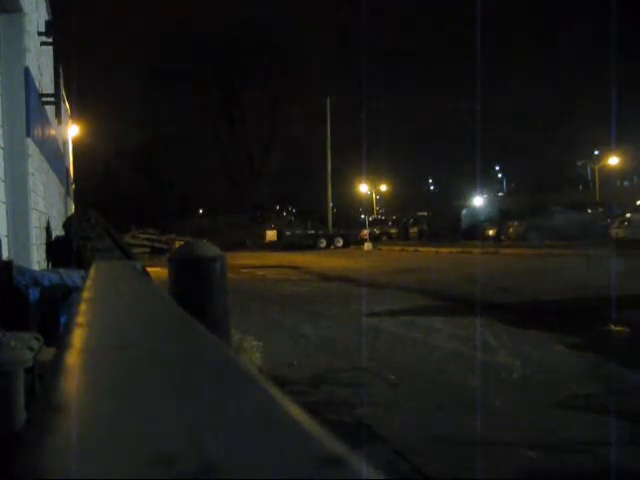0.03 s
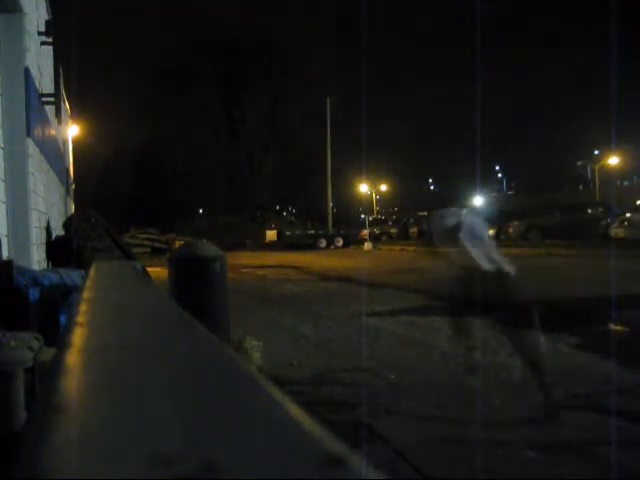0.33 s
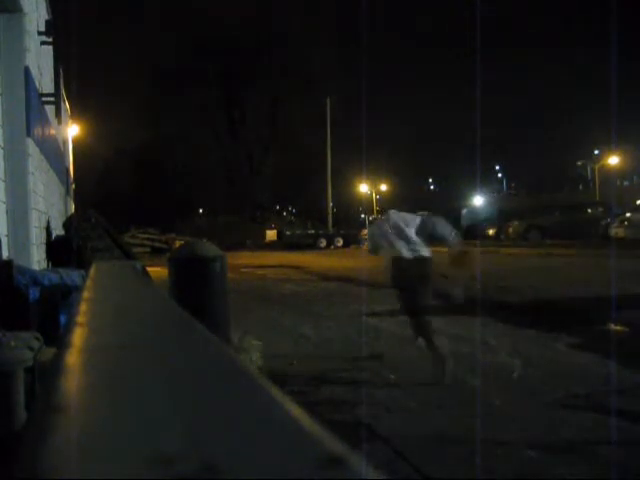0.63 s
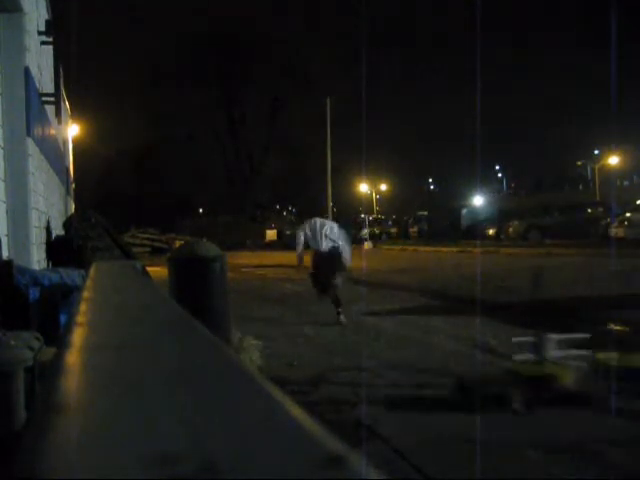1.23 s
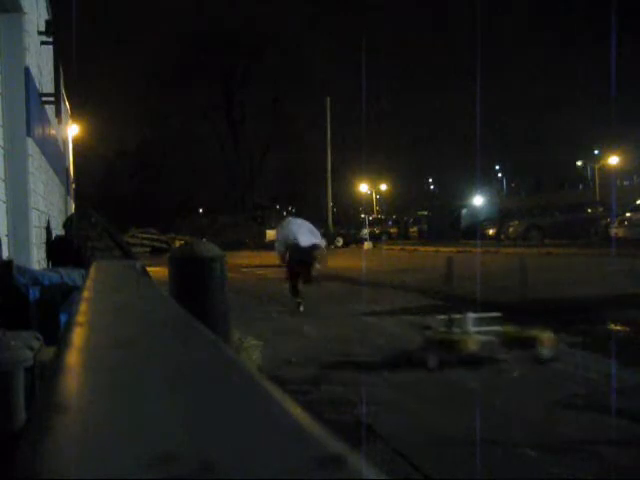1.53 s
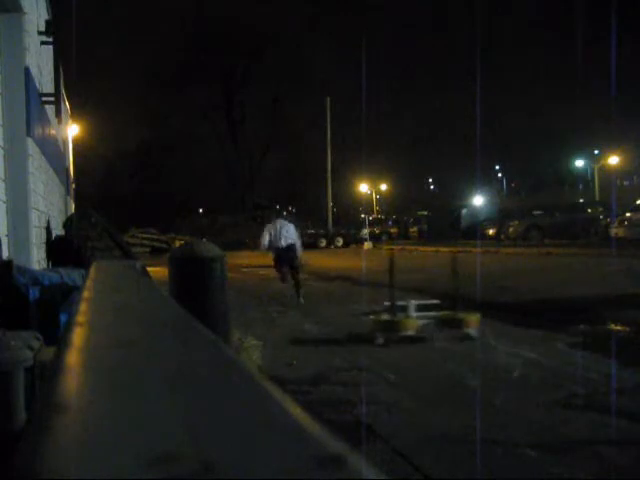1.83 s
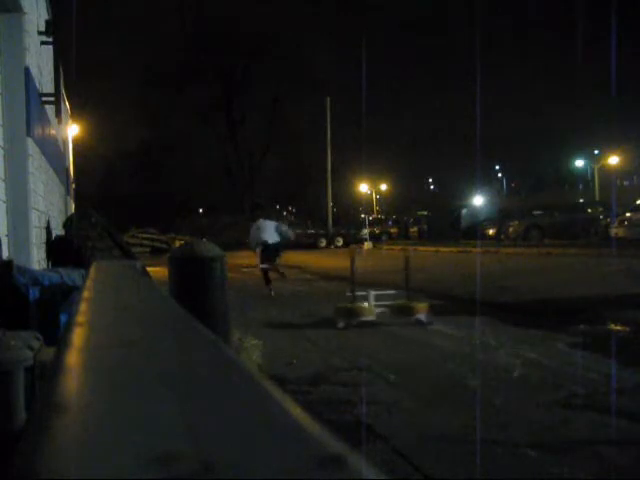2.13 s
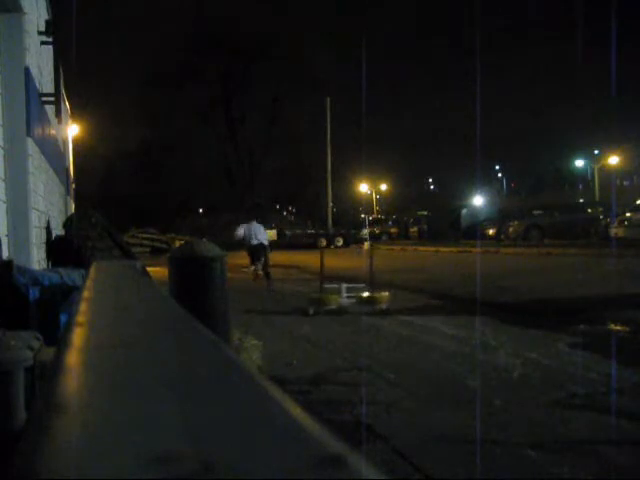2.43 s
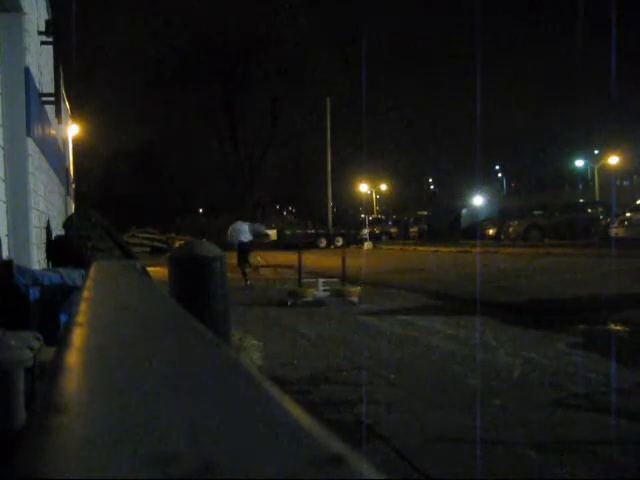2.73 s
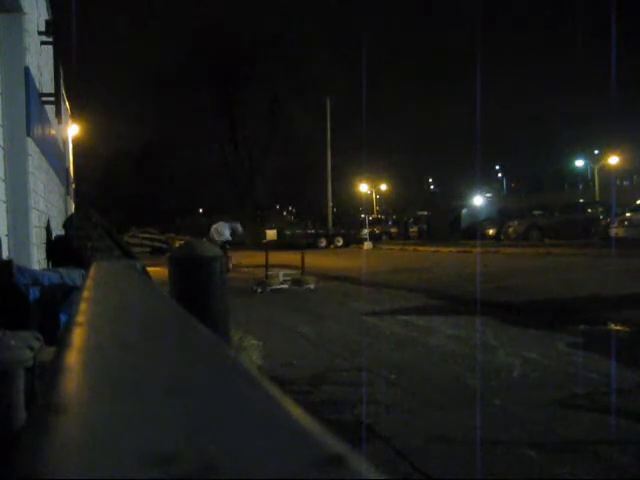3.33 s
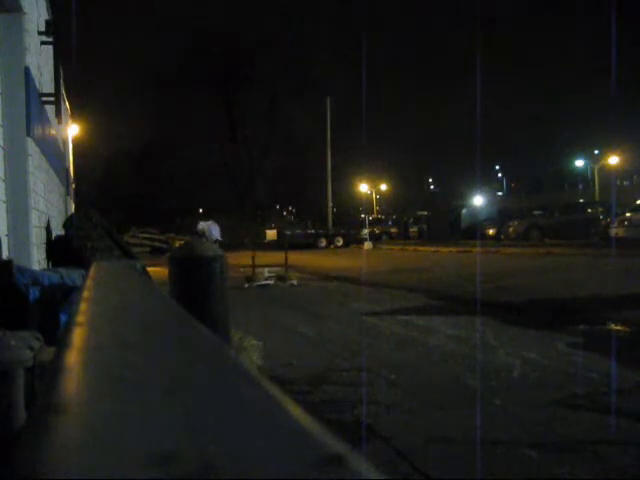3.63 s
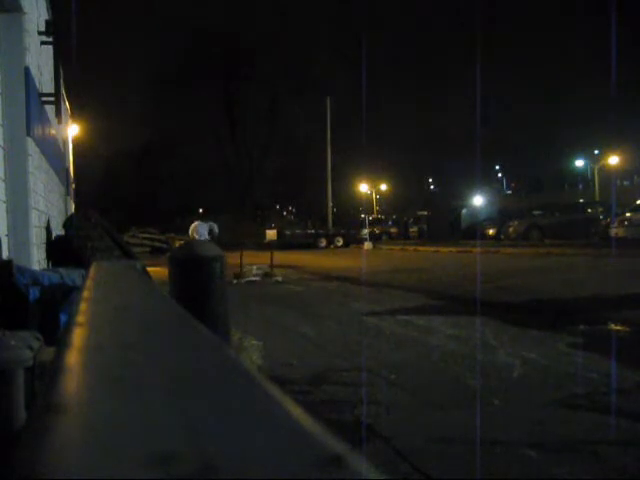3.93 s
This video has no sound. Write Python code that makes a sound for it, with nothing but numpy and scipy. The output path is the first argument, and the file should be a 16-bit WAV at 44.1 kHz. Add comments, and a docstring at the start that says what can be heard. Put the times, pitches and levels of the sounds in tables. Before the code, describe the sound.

Rough, continuous scraping comes from a steel sled dragged over outdoor pavement. Stones tick against it, the skids squeak briefly, and knocks grow more frequent in the second half. Underneath, a low rumble builds and dull buffets touch the microphone.

```python
"""Steel skids grind over grit as a heavy sled is towed away at a run across a paved yard at night.
The scrape shakes the frame into a ringing chatter, and stones tick and ping off the steel.
Bumps make it clank, and the skids squeal briefly as they stick and slip.
Underneath runs a low rumble, and dull buffets reach the microphone, which has a deep treble notch.
The recorder's gain control ducks after the hardest knocks."""
import sys
import numpy as np
from scipy import signal
from scipy.fft import rfft, irfft
from scipy.io import wavfile
from scipy.ndimage import uniform_filter1d

SR = 44100
rng = np.random.default_rng(int(sys.argv[2]) if len(sys.argv) > 2 else 0)


def file_out(sig):
    """Save sig as 16-bit WAV at sys.argv[1]."""
    # one column per channel
    cols = np.atleast_2d(sig).T
    # limit, then scale
    lim = np.clip(cols, -1, 1)
    pcm = np.round(lim * 32767).astype(np.int16)
    wavfile.write(sys.argv[1], SR, pcm)


N = 176400
TIME = np.arange(N) / SR
BIN_HZ = np.arange(N // 2 + 1) * SR / N


def from_db(db):
    """Decibels to gain."""
    return 10 ** (np.asarray(db) / 20)


def rms_one(x):
    """Scale to unit rms."""
    return x / np.sqrt(np.mean(x ** 2) + 1e-20)


def curve(rows):
    """An automation line through (time_s, value) points."""
    return np.interp(TIME, *np.transpose(rows))


def coloured(x, spectrum):
    """EQ a sound through (frequency_hz, gain_db) points; unit rms."""
    hz, db = np.transpose(spectrum)
    eq_db = np.interp(np.log(np.maximum(BIN_HZ, 1)), np.log(hz), db)
    return rms_one(irfft(rfft(x) * from_db(eq_db), N))


def band(x, low_hz, high_hz, order=2):
    """Butterworth band-pass."""
    return signal.sosfilt(signal.butter(order, [low_hz, high_hz], "band", fs=SR, output="sos"), x)


def drift(rate_hz):
    """Smooth random modulation in the two octaves below rate_hz; unit rms."""
    return rms_one(band(rng.standard_normal(N + SR), rate_hz / 4, rate_hz)[SR:])


def resonate(x, hz, width_hz):
    """Ring one two-pole resonance."""
    r = np.exp(-np.pi * width_hz / SR)
    return signal.lfilter([1, 0, -1], [1, -2 * r * np.cos(2 * np.pi * hz / SR), r * r], x + 1e-18)


def grains(per_s, spread_db):
    """Random clicks, mostly small, a few large."""
    sizes = from_db(spread_db * np.minimum(rng.exponential(1, N), 5)) * rng.choice([-1, 1], N)
    return sizes * (rng.random(N) < per_s / SR)


# How hard the skids grind, also driving the catches and pings: time_s, relative_level_db
GRIND_LEVEL = [(0.0, -22), (0.18, -28.5), (0.66, -24.5), (0.69, -23.5), (0.7, -23), (0.75, -26),
               (0.78, -23), (0.79, -19), (0.82, -28), (1.05, -22), (1.22, -26.5), (1.27, -21), (1.35, -22),
               (1.39, -24.5), (1.44, -20), (1.46, -26.5), (1.65, -21.5), (1.66, -23.5), (2.28, -23.5),
               (2.34, -30), (2.37, -22.5), (2.45, -26), (2.46, -17), (2.48, -27), (2.52, -28),
               (2.88, -25.5), (2.945, -28.5), (2.975, -22), (3.0, -25.5), (3.03, -25), (3.07, -28.5),
               (3.1, -25), (3.5, -30), (3.51, -22.5), (3.62, -28), (4.0, -30)]
# Tone of crushed grit, shared with the catches: frequency_hz, gain_db
GRIT_EQ = [(150, -17), (400, -10.5), (700, -9.5), (1000, -4), (1300, -1.5), (1550, -8), (1900, 0.5),
           (2500, -2), (3300, 2), (3900, -2), (4400, -1), (5100, -7), (6300, -6), (7200, -11.5),
           (8800, -12.5), (10200, -17.5), (11200, -14), (12100, -21), (13200, -14), (15400, -18)]
# Thin, high ring of the skids: pitch_hz, width_hz, relative_level_db
SKID_MODES = [(5090, 60, -17), (5930, 380, -10.5), (6360, 190, -12.5), (8820, 100, -19), (9530, 160, -17),
              (10600, 170, -30), (10780, 98, -27), (11460, 110, -24.5), (12200, 60, -30), (12300, 50, -21),
              (13200, 70, -19), (13500, 45, -17), (13800, 50, -29), (14320, 80, -35), (14780, 45, -34)]


def skids():
    """Grit is crushed under the skids, each octave flickering a little, and the steel rings thinly."""
    crush = rfft(grains(per_s=9000, spread_db=1.5))
    octave = np.searchsorted([250, 500, 1000, 2000, 4000, 8000], BIN_HZ)
    grit = sum(irfft(crush * (octave == k), N) * from_db(1.72 * drift(25)) for k in range(7))
    ringing = 0
    for hz, width_hz, db in SKID_MODES:
        waver_db = 3 * drift(19)
        ring = resonate(grains(per_s=9000, spread_db=1.5), hz, width_hz)
        ringing += from_db(db + waver_db) * rms_one(ring)
    crunch = from_db(3.5) * coloured(grit, GRIT_EQ)
    sheen = from_db(-1) * band(ringing, 4600, 14700)
    return from_db(curve(GRIND_LEVEL)) * (crunch + sheen)


# How hard the frame shakes: time_s, relative_level_db
SHAKE_LEVEL = [(0.0, -21), (0.26, -17), (0.38, -24.5), (0.49, -20.5), (0.61, -25.5), (0.69, -18.5),
               (0.71, -37), (0.81, -19.5), (1.08, -24), (1.21, -21.5), (1.22, -22), (1.34, -29),
               (1.35, -10), (1.37, -19.5), (1.86, -17.5), (1.87, -15), (1.89, -17), (2.29, -17.5),
               (2.315, -21.5), (2.36, -14.5), (2.39, -28.5), (2.45, -16.5), (2.53, -22), (2.56, -18),
               (3.01, -23.5), (3.03, -17), (3.04, -23), (3.1, -20.5), (3.46, -20), (3.49, -22.5),
               (3.57, -24), (3.595, -10), (3.61, -19.5), (3.66, -18.5), (3.69, -17), (4.0, -18)]
# Resonances of the steel frame: pitch_hz, width_hz, near_gain_db, far_gain_db
FRAME_MODES = [(732, 73, -15, -16), (906, 220, -16.5, -23), (1121, 150, -12, -23), (1282, 75, -8, -5),
               (1370, 140, -13.5, -13), (1750, 90, -8, -3.5), (1976, 166, -8, -1), (2150, 190, -11, -4),
               (2712, 300, -7.5, -4), (3177, 160, -10, -9.5), (3660, 58, -15, -28), (4200, 190, -17, -16.5)]


def frame(far_from_s=2.16, far_by_s=2.34, pitch_wander=0.02258, flex_hz=16.09):
    """Clumps of jolts ring the flexing frame; its middle resonances take over as the sled draws away."""
    chatter_db = 1.5 * drift(26.5)
    jolts = grains(per_s=2200, spread_db=3) * from_db(chatter_db)
    out = 0
    for hz, width_hz, near_db, far_db in FRAME_MODES:
        ring = resonate(jolts * rng.standard_normal(N), hz, width_hz)
        ring = band(ring, hz / 1.22, hz * 1.206, order=1)
        bend_s = np.cumsum(pitch_wander * drift(flex_hz)) / SR  # flexing bends the pitch
        ring = np.interp(TIME + bend_s, TIME, ring)
        distance_db = curve([(far_from_s, near_db), (far_by_s, far_db)])
        sway_db = drift(flex_hz)
        out += from_db(distance_db + sway_db) * rms_one(ring)
    return from_db(curve(SHAKE_LEVEL) - 2.5) * out


def steel_modes(x, ring_share=0.25, decay_s=0.007, shifts_per_s=6):
    """Part of the scrape rings briefly in many fine modes; new ones take over as the contact shifts."""
    t = TIME[:SR // 25]
    out = np.sqrt(1 - ring_share) * x
    for k in range(int(N / SR * shifts_per_s) + 2):
        modes = rng.standard_normal(len(t)) * np.exp(-t / decay_s)
        crossfade = np.sqrt(np.maximum(1 - np.abs(TIME * shifts_per_s - k), 0))
        out += np.sqrt(ring_share / np.sum(modes ** 2)) * signal.oaconvolve(x * crossfade, modes)[:N]
    return out


# Swell of the scrape's hollow low end: time_s, gain_db
HOLLOW_GAIN = [(0, 2), (.15, -2), (.35, -6.5), (.47, 2), (.56, 6.5), (.65, -0.5), (.95, -0.5), (1.1, -8),
               (1.25, 1), (1.8, 0), (2.15, -3.5), (2.28, 1), (2.45, -3), (2.55, -7.5), (2.66, -4),
               (2.72, -5), (2.86, -1), (2.98, 1.5), (3.05, 2.5), (3.25, 1.5), (3.46, -1), (3.55, 7),
               (3.63, 1.5), (3.85, 3.5), (4, 0)]


def scrape(hollow_below_hz=1100):
    """Skids and frame ring through the steel together; the hollow low end comes and goes."""
    x = steel_modes(skids() + frame())
    low = signal.sosfiltfilt(signal.butter(4, hollow_below_hz, fs=SR, output="sos"), x)
    return x - low + from_db(curve(HOLLOW_GAIN)) * low


def catches(decay_s=0.0045):
    """The skids catch on single stones: sharp, gritty ticks that die at once."""
    ticks = np.abs(grains(per_s=45, spread_db=1.5))
    envelope = signal.lfilter([1], [1, -np.exp(-1 / (decay_s * SR))], ticks + 1e-18)
    return from_db(curve(GRIND_LEVEL)) * envelope * coloured(rng.standard_normal(N), GRIT_EQ)


def pings(per_s=110, low_hz=2676, high_hz=14730, decay_s=0.0054, db_per_octave=-2, spread_db=3.5):
    """Single stones flick the steel, each at a pitch of its own."""
    out, t = np.zeros(N + SR), TIME[:SR // 16]
    level_db = curve(GRIND_LEVEL) - 3
    for when, pitch, softness in rng.random((int(per_s * N / SR), 3)):
        start = int(when * N)
        hz = low_hz + pitch * (high_hz - low_hz)
        db = level_db[start] + db_per_octave * np.log2(hz / low_hz) + spread_db * (1 - 2 * softness)
        out[start:start + len(t)] += from_db(db) * np.sin(2 * np.pi * hz * t) * np.exp(-t / decay_s)
    return out[:N]


# Rise of the low bed: time_s, level_db
RUMBLE_LEVEL = [(0, -46), (1, -44.5), (1.2, -47), (1.6, -41), (2.3, -40), (2.8, -41.5), (3.1, -42),
                (3.35, -36.5), (4, -35.5)]
# Its dark tone: frequency_hz, gain_db
RUMBLE_EQ = [(20, 0), (55, 1.5), (130, -0.5), (260, -1.5), (500, -2), (900, -6), (2000, -52)]


def rumble():
    """A low, uneven rumble builds under the sled."""
    flutter_db = 2.1 * drift(23)
    return from_db(curve(RUMBLE_LEVEL) + flutter_db) * coloured(rng.standard_normal(N), RUMBLE_EQ)


# Hits on bumps: start_s, relative_level_db, pitch_hz, contact_s, crack_db, purity (0 rattle, 1 clank)
BUMP_HITS = [(0.181, -8.5, 1980, .006, -13, 0.2), (0.259, -9, 3200, 0.0051, -8, 0.1),
             (0.336, -7, 1180, 0.0042, -2, 0.5), (0.473, -19, 1180, 0.0026, 12, 0.4),
             (0.6818, 4, 3500, .002, 0, 0.2), (0.684, -0.5, 2870, 0.0019, -8.5, 0.07),
             (0.785, -7.5, 1070, 0.018, 1, 0.1), (0.931, -7.5, 1910, 0.0085, -8, 0.1),
             (1.036, 1.5, 2120, 0.0008, -9, 0.5), (1.2047, -0.5, 2394, 0.0059, -15, 0.7),
             (1.3435, 7, 1850, 0.00048, -8, 0.7), (1.3465, 3.5, 1490, 0.00037, -4, 0.5),
             (1.3484, 4.5, 2480, 0.00055, -16, 0.7), (1.844, -5.5, 2660, .004, -4, 0.6),
             (1.8702, 6, 2750, .0009, -6, 0.6), (2.114, -7, 1690, 0.025, -8, 0),
             (2.2157, 3.5, 1550, 0.00046, -21, 0.8), (2.2835, 0.5, 1920, 0.0023, -9, 0.6),
             (2.297, -3, 1850, .003, -23, 0.3), (2.3244, 1.5, 1880, 0.0023, -20, 0.7),
             (2.431, -6, 2070, .008, -22, 0.5), (2.4494, 1.5, 1870, 0.0031, -19, 0.8),
             (2.455, -6, 2020, 0.0059, -14, 0.4), (2.484, -2.5, 2020, .003, -5, 0.7),
             (2.551, -6.5, 1750, 0.0063, -13, 0.6), (2.603, -5.5, 2050, 0.009, -11, 0.5),
             (2.6496, -1, 1930, 0.0027, -20, 0.3), (2.6572, -1.5, 1440, 0.003, -20, 0.6),
             (2.694, -8, 1810, 0.0022, -11, .7), (2.7122, 2, 1870, .0007, -15, 0.6),
             (2.779, -6.5, 1830, 0.0039, -22, .8), (2.83, -8, 1790, 0.0037, -9, 0.6),
             (2.878, -2.5, 2080, 0.0039, -16, 0.5), (2.898, -7, 1800, 0.0043, -15, 0.8),
             (2.986, 0, 2430, 0.00087, -13, 0.5), (3.0234, 4.5, 1750, 0.0057, -10.5, 0.4),
             (3.089, -1, 1795, .003, -7, .6), (3.1644, -4, 1324, 0.0025, -16, 0.9),
             (3.192, -4, 1320, 0.0035, -16, 1), (3.28, -5.5, 1750, 0.003, -14.5, .7),
             (3.351, -7.5, 2930, .004, -5, .5), (3.425, -7, 1810, .005, -18, 0.9),
             (3.226, -4, 1770, 0.0035, -14, 0.88), (3.32, -6, 2030, 0.0043, -4, .7),
             (3.388, 1, 1380, .0018, -17, 0.2), (3.4545, -5, 1310, .004, -16, 0.8),
             (3.555, 1, 2160, .0004, -6, .8), (3.5773, 6, 2770, 0.0016, -9.5, 1),
             (3.6223, 2, 2000, 0.0022, -20, 0.84), (3.687, -6, 1940, 0.0097, -12, 0.3),
             (3.742, -4, 1950, .003, -15, .8), (3.776, -7, 2100, 0.0026, 0, 0.7),
             (3.85, -6, 1800, 0.0032, -11.5, 0.4), (3.94, -7, 1930, 0.0087, -17, 0.55),
             (3.98, -9, 2100, 0.0076, -14, 0.7)]


def knocks(trim_db=-9.5, fall_s=0.0015, tail_db=-6, tail_s=0.013):
    """A skid hits a bump: brief hard contact, a damped ring of clank and rattle, a crack, a short tail."""
    out, t = np.zeros(N + SR), TIME[:SR // 8]
    for start_s, db, hz, contact_s, crack_db, purity in BUMP_HITS:
        rattle_noise, crack_noise = rng.standard_normal((2, len(t)))
        rattle = rms_one(band(resonate(rattle_noise, hz, width_hz=660), 1060, 3700))
        ring = np.sqrt(2 * purity) * np.sin(2 * np.pi * hz * t) + np.sqrt(1 - purity) * rattle
        crack = from_db(crack_db) * rms_one(band(crack_noise, 500, 6100))
        blow = np.exp(-np.maximum(t - contact_s, 0) / fall_s)
        tail = from_db(tail_db) * np.exp(-t / tail_s)
        hit = (ring + crack) * (blow + tail)
        hit *= np.sqrt(np.sum(blow ** 2) / np.sum(hit ** 2))  # the blow alone sets the energy
        start = int(start_s * SR)
        out[start:start + len(t)] += from_db(db + trim_db) * hit
    return out[:N]


# Dull thumps at the microphone: peak_s, relative_level_db, rise_and_fall_s
BUFFET_SWELLS = [(0.196, -26.5, 0.023), (0.433, -26.5, 0.011), (0.624, -25, 0.0091), (0.781, -28, 0.019),
                 (1.025, -25, 0.015), (1.1, -19, 0.013), (1.331, -19, 0.0038), (1.578, -26.5, .006),
                 (2.002, -18, 0.0046), (2.217, -14.5, 0.0059), (2.345, -22.5, 0.013),
                 (2.392, -21.5, 0.0066), (2.422, -20.5, 0.0078), (3.217, -21.5, 0.007), (3.32, -22, 0.013),
                 (3.427, -31, 0.011), (3.544, -19, 0.0072), (3.61, -26, 0.02)]


def buffets(trim_db=-4):
    """Dull buffets reach the microphone: bass noise that swells and dies in a moment."""
    air = band(rng.standard_normal(N), 39.4, 201)
    out = 0
    for peak_s, db, rise_and_fall_s in BUFFET_SWELLS:
        swell = np.exp(-np.minimum(np.abs(TIME - peak_s) / rise_and_fall_s, 20))
        thump = air * swell
        out += from_db(db + trim_db) * thump * np.sqrt(np.sum(swell ** 2) / np.sum(thump ** 2))
    return out


# Stick-slip squeals: start_s, length_s, start_pitch_hz, end_pitch_hz, relative_level_db
SQUEAL_GLIDES = [(.42, 0.039, 4550, 4590, -29), (.63, 0.068, 1870, 1840, -31),
                 (0.826, 0.058, 1373, 1315, -26.5), (.83, 0.13, 3660, 3650, -35),
                 (0.866, 0.085, 1095, 1160, -29), (1.08, 0.055, 2600, 2470, -24),
                 (1.075, 0.089, 3690, 3685, -27), (1.1, 0.052, 1396, 1353, -26.5),
                 (1.135, 0.065, 2530, 2450, -22.5), (1.173, 0.043, 3690, 3650, -30),
                 (1.197, 0.018, 1885, 1890, -18.5), (1.252, .05, 3600, 3700, -30),
                 (2.285, .036, 1244, 1114, -22), (2.478, 0.031, 1873, 1970, -20),
                 (2.651, 0.022, 1407, 1460, -26)]


def squeals(trim_db=1):
    """A skid sticks and slips fast enough to sing: short, rough, gliding tones."""
    out = np.zeros(N)
    jitter_hz, rough_db = 32 * drift(180), 3.5 * drift(110)
    for start_s, length_s, start_hz, end_hz, db in SQUEAL_GLIDES:
        progress = np.linspace(0, 1, int(length_s * SR))
        span = int(start_s * SR) + np.arange(len(progress))
        hz = start_hz + progress * (end_hz - start_hz) + jitter_hz[span]
        envelope = np.sqrt(progress * (1 - progress)) * from_db(rough_db[span])
        tone = np.sin(2 * np.pi * np.cumsum(hz) / SR)
        out[span] += from_db(db + trim_db) * rms_one(tone * envelope)
    return out


def scene():
    """The sled, the rumble and the buffets, mixed in mono."""
    return (scrape() + catches() + pings() + rumble() + knocks() + buffets() + squeals())[None]


def gain_control(x, threshold_db=-10.5, duck_share=0.8, recover_db_per_s=28, attack_s=0.0049):
    """Loud peaks pull the gain down; it recovers at a steady rate."""
    level_db = 10 * np.log10(np.abs(uniform_filter1d(x ** 2, size=130)) + 1e-9)
    excess_db = np.maximum(level_db - threshold_db, 0)
    recovery_db = recover_db_per_s * TIME
    duck_db = np.maximum.accumulate(duck_share * excess_db + recovery_db) - recovery_db
    pole = np.exp(-1 / (attack_s * SR))
    return x * from_db(-signal.lfilter([1 - pole], [1, -pole], duck_db))


def record(dry, notch_hz=7863, notch_width_hz=1550, cutoff_hz=15500):
    """The microphone's treble notch, gain control, overload on the hardest knocks, a steep high cut."""
    x = signal.lfilter(*signal.iirnotch(notch_hz, Q=notch_hz / notch_width_hz, fs=SR), dry[0])
    x = signal.lfilter(*signal.iirnotch(notch_hz, Q=22, fs=SR), x)  # deepens the centre
    x = np.clip(gain_control(x), -1, 1)
    return signal.sosfilt(signal.ellip(12, 0.2, 75, cutoff_hz, fs=SR, output="sos"), x)[None]


dry = scene()
out = record(dry)
file_out(out)
```